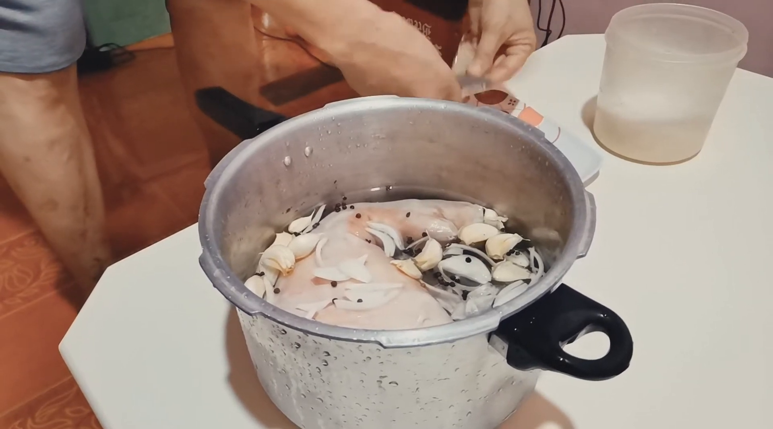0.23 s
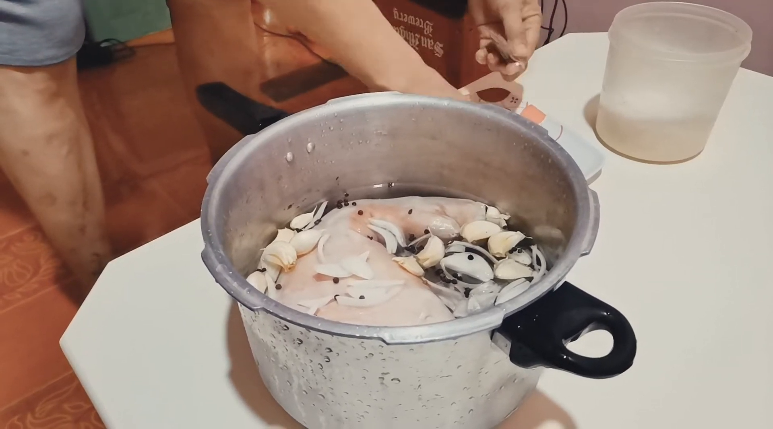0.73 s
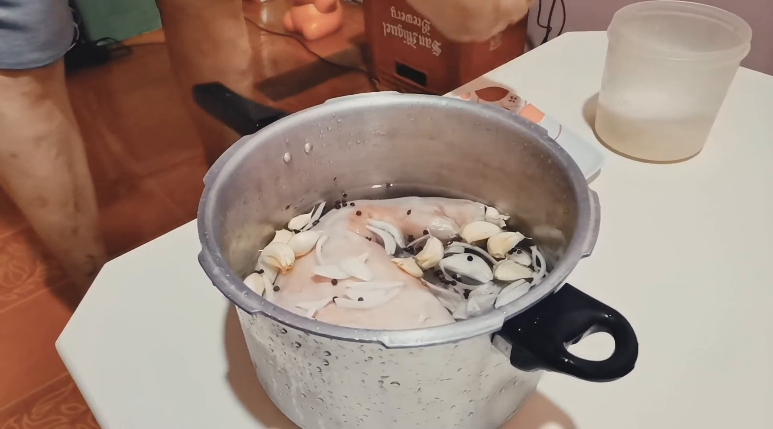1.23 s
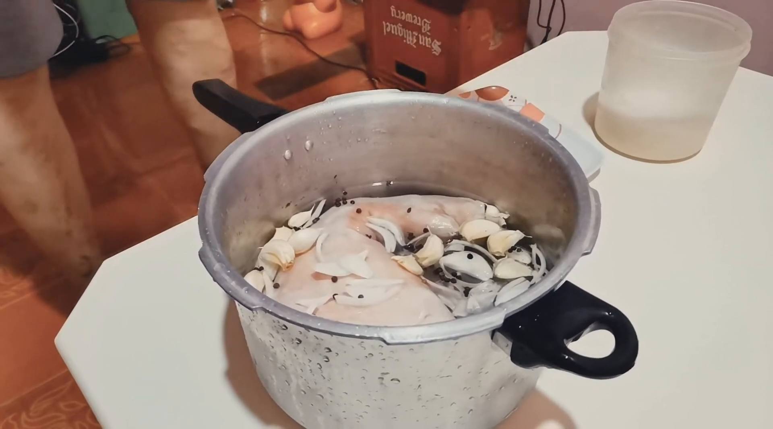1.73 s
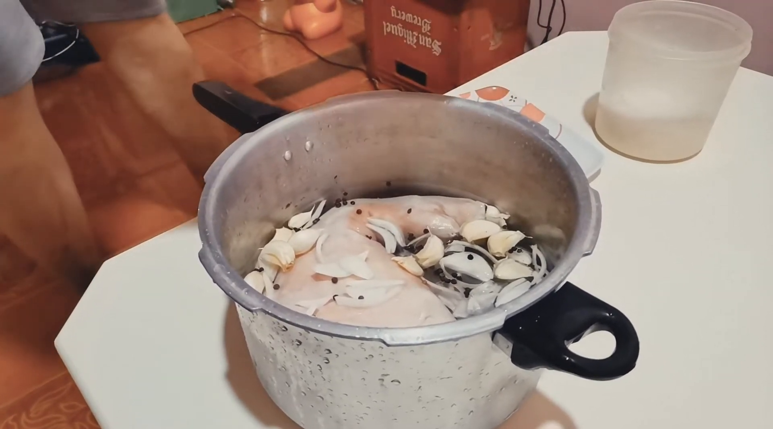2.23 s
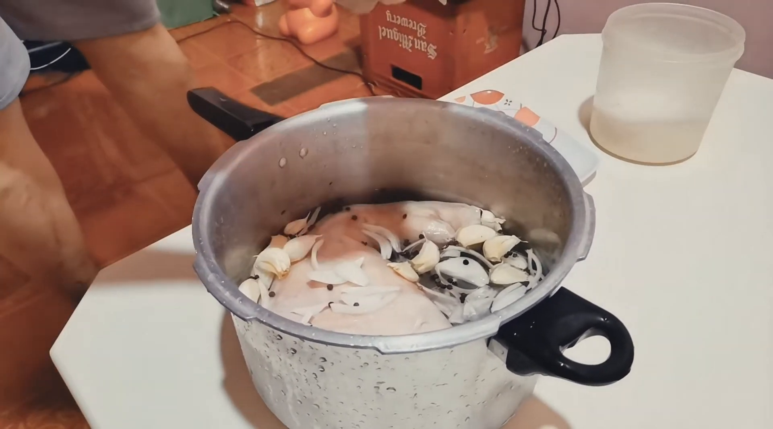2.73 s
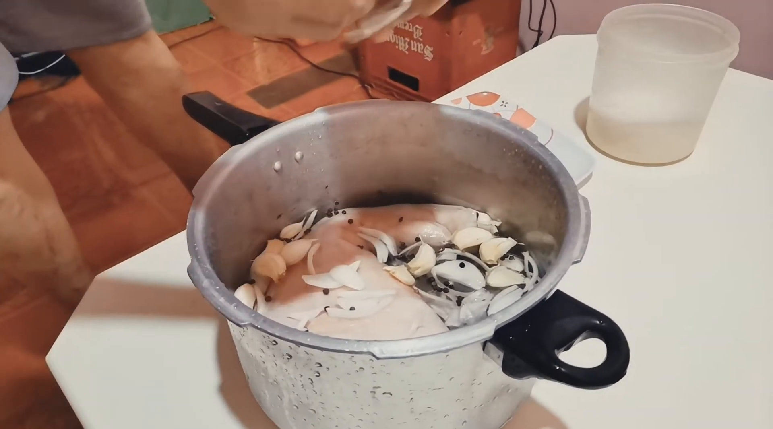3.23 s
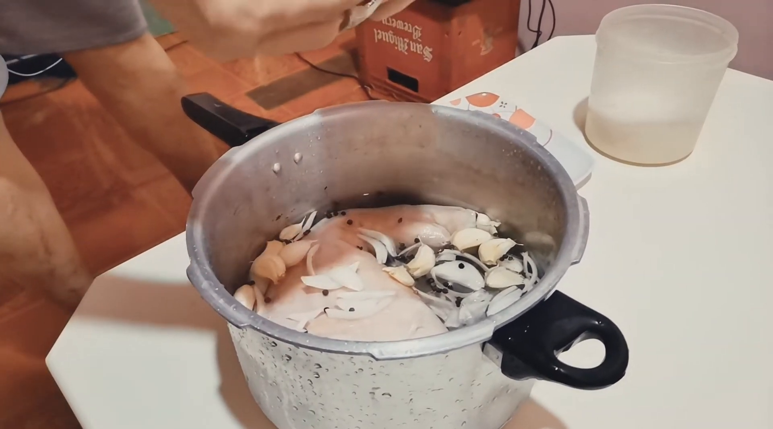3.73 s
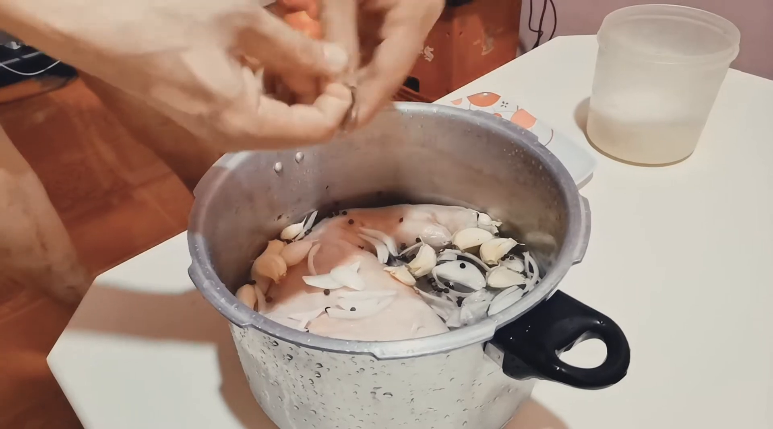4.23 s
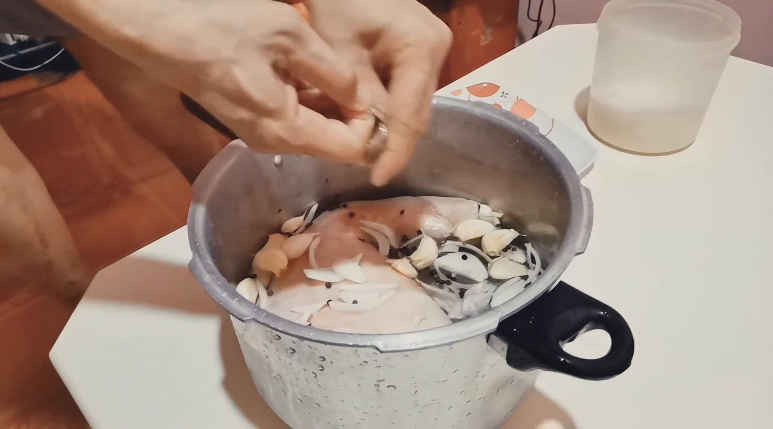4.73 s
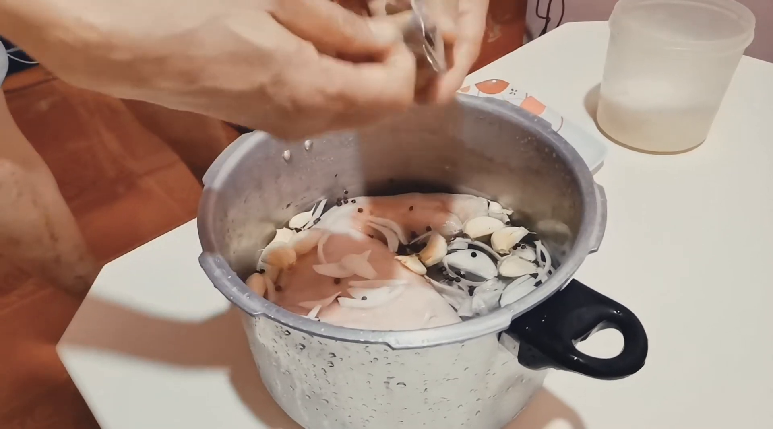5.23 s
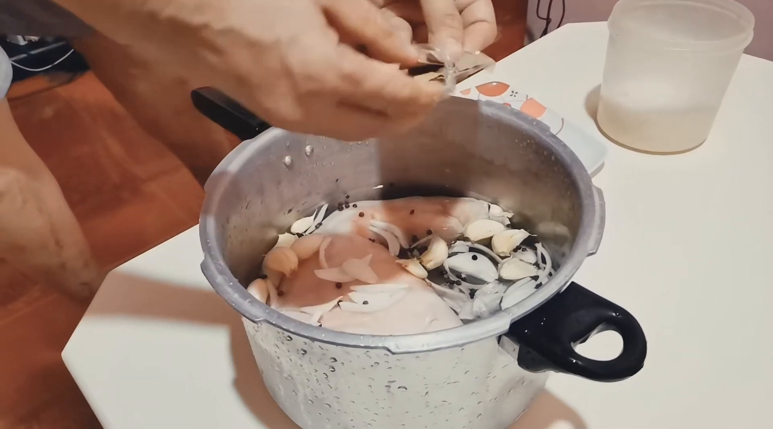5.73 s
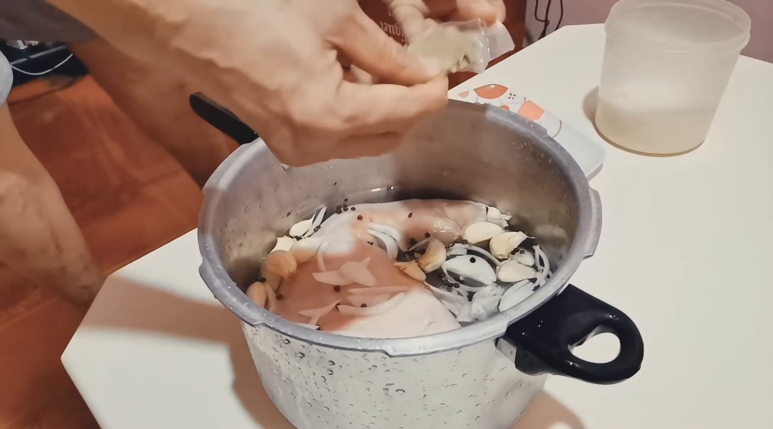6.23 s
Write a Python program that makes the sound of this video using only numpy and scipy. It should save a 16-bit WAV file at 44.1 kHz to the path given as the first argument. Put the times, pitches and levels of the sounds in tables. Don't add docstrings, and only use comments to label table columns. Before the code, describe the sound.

Hands crumple a stiff little bag of dried leaves close to a stereo microphone, left of centre. Sharp bright snaps and clumped crackles come irregularly, strongest in the first second, then finer and steadier. A distant slipper slaps the floor twice early on, barely audible; faint squeaks pass far left. Late crackles gain a slight hollow hum from a pot. Hard kitchen, low household rumble beneath.

```python
import sys
import numpy as np
from scipy import signal
from scipy.fft import rfft, irfft
from scipy.io import wavfile

SR = 44100
rng = np.random.default_rng(int(sys.argv[2]) if len(sys.argv) > 2 else 0)


def ratio(d):
    e = np.asarray(d, float) / 20
    return 10 ** e


def pcm_store(signal):
    levels = np.round(np.clip(np.atleast_2d(signal), -1, 1) * 32767)
    wavfile.write(sys.argv[1], SR, levels.astype(np.int16).T)


N = 286209

# start_s [s], level_db [dB], pitch_hz # of the crease [Hz]
SHARP_SNAPS = [(0.0313, -30, 6560), (0.0882, -30, 4490), (0.1521, -21, 2830), (0.3346, -32, 5680),
                  (0.3805, -23, 5690), (0.5023, -21, 4870), (0.6015, -27, 4800), (0.6365, -28, 2860),
                  (0.7168, -17, 3510), (0.8195, -21, 2440), (1.0425, -27, 4160), (1.1812, -35, 1900),
                  (1.3074, -33, 4410), (1.3548, -26, 5620), (1.484, -35, 2040), (1.6127, -37, 6220),
                  (1.6631, -30, 6170), (1.7285, -28, 3760), (1.8114, -29, 2080), (1.8841, -27, 3470),
                  (2.0418, -25, 3150), (2.0931, -28, 2840), (2.1695, -21, 2780), (2.2712, -31, 4070),
                  (2.3506, -28, 3850), (2.5496, -23, 2360), (2.5774, -25, 2840), (2.6115, -26, 4150),
                  (2.7252, -25, 4820), (2.9652, -24, 6390),
                  (3.2036, -27, 4130), (3.4186, -29, 2740), (3.5034, -31, 5990), (3.5817, -28, 3870),
               (3.686, -24, 6550), (3.7563, -27, 3110), (3.8601, -29, 6420), (3.904, -28, 6110),
               (3.9649, -36, 3660), (4.2238, -32, 6550), (4.2662, -31, 3260), (4.3121, -26, 3660),
               (4.4488, -30, 5040), (4.4722, -28, 4550), (4.5485, -32, 4550), (4.6089, -27, 5290),
               (4.6628, -30, 5470), (4.8643, -31, 3660), (4.9796, -29, 3220), (5.2928, -33, 2800),
               (5.3063, -28, 2850), (5.3662, -29, 2810), (5.6106, -27, 2850), (5.877, -28, 4520),
               (5.9673, -30, 4530), (6.0097, -30, 2880), (6.1175, -28, 2870), (6.2068, -26, 3610),
               (6.2911, -27, 4470), (6.3909, -31, 4500)]
SNAPS = SHARP_SNAPS


def snaps(place, level_db, low_db, high_db, tear_s):
    start_s, peak_db, pitch_hz = np.transpose(SNAPS)
    at = (start_s * SR).astype(int)
    clicks = np.zeros(N)
    luck = rng.random((len(start_s), 2, 14))
    for k in range(14):
        after = k > 0
        wait_s = after * (.0004 + luck[:, 0, k] ** 2 * 3 * tear_s)
        size = ratio(peak_db + level_db - 6.0 * after) * np.exp(-wait_s / tear_s)
        size *= np.cos(np.pi * luck[:, 1, k] * after)
        np.add.at(clicks, np.minimum(at + (wait_s * SR).astype(int), N - 1), size)
    latest = last_snap()
    _, low, high = hands()
    into = at[latest] + 200
    shape = pitch_hz[latest], low[into] + low_db, high[into] + high_db
    rings = creases(clicks, shape, cycles=8.3, spread_db=1.2, focus_db=19.0)
    heard = np.abs(coloured(placed(rings, *place).mean(axis=0), LEAF_COLOUR))
    tops = np.maximum.reduceat(heard, at)
    return rings * (ratio(peak_db + level_db) / tops)[latest]


def last_snap():
    at = (np.array(SNAPS)[:, 0] * SR).astype(int)
    return np.clip(np.searchsorted(at, np.arange(N), side="right") - 1, 0, None)


def crackle(per_s, level_db, low_db, high_db):
    press_db, low, high = hands()
    pitch_hz = np.array(SNAPS)[last_snap(), 2]
    sizes = ratio(2.94 * np.minimum(rng.exponential(1, N), 2.3)) * rng.choice([-1, 1], N)
    chance = per_s * ratio(4.0 * drift(30)) / SR
    grains = rms_one(sizes * (rng.random(N) < chance)) * ratio(press_db + level_db)
    shape = pitch_hz, low + low_db, high + high_db
    return creases(grains, shape, cycles=6.5, spread_db=6.5, focus_db=7.5)


# start_s [s], hold_s [s],
# level_db of the crackle [dB], low_creases_db [dB], high_creases_db [dB]
BAG_GRIPS = [(0.0, .15, -42, -14.5, -9), (.152, 0.0067, -33.5, -11, -36), (.334, .04, -47, -13, -3),
             (.38, 0.059, -41, -13.5, -6.5), (.502, 0.029, -34.5, -18, -9),
             (.601, 0.05, -44.5, -33, -3.5), (.716, 0.024, -35.5, 3, -27), (.82, 0.075, -37, -2.5, -36),
             (1.042, 0.05, -42.5, -7, -4), (1.181, 0.037, -64, 13, -14), (1.307, 0.04, -68, -8, -13),
             (1.484, .04, -51.5, -7, 6), (1.612, 0.034, -50.5, -6, -23),
             (1.663, 0.072, -43.5, -14, -4.5), (1.812, .06, -45.5, -25, -3.5),
             (1.884, 0.031, -34.5, -12.5, -10.5), (2.042, 0.11, -44.5, 0.5, -4),
             (2.169, 0.013, -37, -4.5, -10), (2.271, 0.12, -43.5, -8.5, -10),
             (2.35, 0.086, -40, -9, -16.5), (2.55, .1, -38.5, -7, -9), (2.69, 0.07, -40.5, -25, -9.5),
             (2.79, 0.063, -46.5, -8.5, 0), (2.945, 0.11, -42.5, -8, -3),
             (3.197, 0.059, -42, -36, -1), (3.276, 0.024, -45.5, -3, -2), (3.342, 0.04, -47.5, -1, -20),
             (3.501, 0.11, -44.5, -23, 0.5), (3.657, 0.18, -42.5, -31, -11), (3.762, 0.12, -39, -12.5, -4),
             (3.962, 0.0067, -50, -33, -21), (4.148, .02, -49.5, -7, -4), (4.212, 0.078, -44.5, -7, -7.5),
             (4.301, 0.13, -41, -6.5, -9.5), (4.445, 0.042, -40, -17, -10), (4.523, 0.1, -43.5, -17.5, -3),
             (4.661, 0.045, -42.5, -33, -4), (4.769, 0.088, -54, -11, -3.5),
             (4.87, 0.011, -49.5, -6.5, 0.5), (4.965, 0.16, -41, -6.5, -6),
             (5.366, 0.076, -39.5, -10.5, -6), (5.515, 0.1, -47, -11.5, -6.5),
             (5.607, 0.025, -45.5, -4, -11), (5.686, 0.14, -49, -9, -7), (5.862, 0.2, -42.5, -11, -4),
             (6.115, 0.14, -39.5, -8, -8), (6.292, 0.015, -42, -5.5, -6.5), (6.386, 0.062, -45, -4, -4)]
# start_s [s], swell_s [s], level_db [dB], low_creases_db [dB], high_creases_db [dB]
BAG_TWISTS = [
    (.84, 0.11, -39.5, -15, -5),
    (1.29, 0.076, -38.5, -5.5, -2),
    (1.84, 0.083, -45, -30, 5),
    (2.33, 0.15, -38, -50, 0),
    (3.07, 0.11, -52.5, -21, 2.5),
    (3.37, 0.088, -37.5, -14, -2.5),
    (3.96, 0.085, -38, -36, -0.5),
    (5.24, 0.1, -42.5, -7.5, -15.5),
    (6.09, 0.073, -34, -15, -7),
]
LOOSE_DB = [
    [-70],
    [-76],
    [-88],
]
RISE_S = [
    [.003],
    [.012],
    [.0015],
]
TWIST_SWELL_DB, LET_GO_DB_PER_S = 7, 418
BURST_DB, BURST_S = 7, .012


def hands():
    t = np.arange(0, N + 32, 32) / SR
    power = ratio(2 * np.array(LOOSE_DB))
    moves = ((BAG_GRIPS, 0, BURST_DB), (BAG_TWISTS, TWIST_SWELL_DB, 0))
    for rows, swell_db, burst_db in moves:
        for start_s, length_s, level_db, low_db, high_db in rows:
            since = t - start_s
            shape_db = swell_db * np.minimum(since / length_s - 1, 0)
            shape_db -= LET_GO_DB_PER_S * np.maximum(since - length_s, 0)
            shape_db += burst_db * np.exp(-np.abs(since) / BURST_S)
            group_db = np.array([[0], [low_db], [high_db]])
            power = power + np.clip(since / RISE_S, 0, 1) * ratio(2 * (level_db + shape_db + group_db))
    press_db, low, high = (np.interp(np.arange(N) / SR, t, 10 * np.log10(p)) for p in power)
    return press_db, low - press_db, high - press_db


def creases(clicks, shape, cycles, spread_db, focus_db):
    favoured_hz, low_db, high_db = shape
    pitches = np.geomspace(650, 15000, 20)
    picks = rng.standard_normal((4, N))
    octave_like = np.log(pitches[:, None] / favoured_hz) / 0.33
    near_db = focus_db * np.exp(-octave_like ** 2)
    chance_db = [spread_db * np.roll(picks[k % 4], k) + 4.8 * drift(7.2) for k in range(len(pitches))]
    gains = ratio(near_db + chance_db)
    group = np.searchsorted([1800, 7000], pitches)
    for k, group_db in enumerate((low_db, 0, high_db)):
        gains[group == k] *= ratio(group_db) / np.sqrt(np.mean(gains[group == k] ** 2, axis=0))
    return sum((-1) ** k * ring(clicks * gains[k], hz, cycles / hz) for k, hz in enumerate(pitches))


# pitch_hz [Hz], level_db [dB per Hz]
LEAF_COLOUR = [(240, -20), (400, -19.5), (636, -10), (708, -14), (994, -4), (1140, -5), (1960, 3.5),
               (2840, 9.5), (4650, 13.5), (5270, 14), (9180, 15.5), (10200, 9), (12100, 11), (13500, 19),
               (16000, 14)]


def leaves(bag, place, pan_db):
    lean_db = np.array([pan_db, -pan_db]) * 0.23
    pair = placed(bag, *place) + ratio(-34.5) * kitchen(bag, build_s=0.00025, count=5) * ratio(lean_db)
    pair = np.array([coloured(pair[0], LEAF_COLOUR, .5), coloured(pair[1], LEAF_COLOUR, -.5)])
    return split_at(pair, 420, "high", order=3)


def pot(bag):
    close = np.interp(np.arange(N) / SR, (5.1, 5.5), [0, 1])
    hum = ring(bag * close, 570, 0.0079)
    return ratio(-27.5) * placed(split_at(hum, 430, "high", order=3), 1.5, 0.0)


# start_s [s], level_db of the peak [dB]
SLIPPER_SLAPS = [
    (0.7167, -27),
    (0.8165, -30),
    (0.869, -37),
]
# pitch_hz [Hz], level_db [dB], t60_s [s]
SLIPPER_MODES = [
    (229, -15.5, 0.12),
    (323, -1.5, 0.0057),
    (970, -29, 0.04),
    (1540, -25, 0.025),
    (1850, -7.5, 0.015),
    (2380, 0, 0.006),
    (3120, 3, 0.0043),
    (4420, -10, 0.024),
]


def slaps(level_db):
    t = np.arange(N) / SR
    drive = np.zeros(N)
    for start_s, peak_db in SLIPPER_SLAPS:
        dying = np.exp(-np.maximum(t - start_s, 0) / 0.027)
        drive += ratio(peak_db + level_db) * (t > start_s) * dying
    drive *= rng.standard_normal(N)
    body = sum(ratio(db) * ring(drive, hz, t60_s) for hz, db, t60_s in SLIPPER_MODES)
    return split_at(body, 160, "high")


# start_s [s], length_s [s], from_hz [Hz], to_hz [Hz], level_db [dB]
FAR_SQUEAKS = [
    (.33, .12, 560, 620, -59),
    (1.58, .13, 1370, 1430, -61),
    (1.48, .08, 2150, 2050, -61),
    (1.82, .13, 2000, 2200, -56),
    (3.03, .17, 1110, 1230, -65),
    (3.14, .15, 1230, 1080, -66),
    (6.14, .14, 630, 590, -61),
]


def squeaks():
    t, out, breath = np.arange(N) / SR, np.zeros(N), drift(65)
    for start_s, length_s, from_hz, to_hz, level_db in FAR_SQUEAKS:
        u = np.clip((t - start_s) / length_s, 0, 1)
        hz = from_hz + (to_hz - from_hz) * u
        tone = np.sin(2 * np.pi * np.cumsum(hz) / SR)
        out += ratio(level_db) * np.sin(np.pi * u) * breath * tone
    return out


# pitch_hz [Hz], t60_s [s]
KITCHEN_T60 = [(250, 0.21), (1000, 0.34), (3000, 0.31), (6000, 0.41), (10000, 0.3), (15000, 0.24)]


def kitchen(x, build_s, count):
    t = np.arange(SR // 2) / SR
    hz = np.fft.rfftfreq(len(t), 1 / SR)
    edges = 60 * 2 ** np.arange(0, 9, .5)
    white = rfft(rng.standard_normal((count, 2, len(t))))
    echoes = 0
    for low, high in zip(edges, edges[1:]):
        band = irfft(white * ((hz >= low) & (hz < high)))
        echoes = echoes + band * ratio(-60 * t / at_hz(KITCHEN_T60, np.sqrt(low * high)))
    early = ratio(-5.0) * np.exp(-t / 0.031)
    echoes = echoes * (1 - np.exp(-t / build_s)) * (1 + early)
    spot = np.arange(N) / SR / .15 % count
    wet = 0
    for k, echo in enumerate(echoes):
        apart = np.abs((spot - k + count / 2) % count - count / 2)
        share = np.sqrt(np.clip(1 - apart, 0, 1))
        wet = wet + signal.fftconvolve((x * share)[None], echo, axes=1)[:, :N]
    return wet


def far_room(far):
    echoes = kitchen(far, build_s=0.00043, count=2)
    bass = split_at(echoes[0], 486, "low")
    return split_at(echoes, 486, "high") + placed(bass, 3.5, 0.0)


# pitch_hz [Hz], level_db [dB per Hz]
RUMBLE_COLOUR = [(15, -16.5), (32, -3), (45, -4.5), (60, -9.5), (90, -11.5), (125, 10), (200, -4.5),
                 (300, -15), (460, -19.5), (960, -20.5), (3500, -31.5), (9400, -82), (11000, -44),
                 (16000, -70)]
# start_s [s], level_db [dB]
BUSTLE = [(1.0, -52), (1.11, -58), (1.29, -47.5), (1.44, -51.5), (2.3, -54.5), (2.33, -48), (2.44, -59),
          (3.19, -55.5), (4.1, -63.5), (4.16, -55.5), (4.67, -60.5), (5.89, -49), (5.97, -58), (6.2, -61.5),
          (6.49, -60)]


def rumble(alike):
    mid, side = rng.standard_normal((2, N))
    pair = []
    for k in (1, -1):
        mixed = np.sqrt(1 + alike) * mid + k * np.sqrt(1 - alike) * side
        pair.append(coloured(mixed, RUMBLE_COLOUR) * ratio(k * 1.2))
    pair = np.array(pair)
    upper_db, = in_time(BUSTLE)
    usual_db = upper_db.mean()
    deep_db = usual_db + 4.5 + 0.83 * (upper_db - usual_db)
    deep = rms_one(split_at(pair, 110, "low")) * ratio(deep_db + drift(26))
    upper = rms_one(split_at(pair, 110, "high")) * ratio(upper_db + 4.0 + drift(7.1))
    return deep + upper


def placed(x, pan_db, lead_ms):
    n = np.arange(N)
    return np.array([np.interp(n + k * lead_ms * SR / 2000, n, x) * ratio(k * pan_db / 2) for k in (1, -1)])


# pitch_hz [Hz], left_minus_right_db [dB]
PORT_COLOUR = [(60, -10), (110, 25), (200, 35), (380, -2.5), (700, -7.5), (1290, -9), (2380, -7),
               (4400, -10.5), (8120, -6.5), (15000, -0.5)]


def coloured(x, spectrum, sides_db=0):
    hz = np.fft.rfftfreq(8192, 1 / SR)
    gain = ratio(at_hz(spectrum, hz) + sides_db * at_hz(PORT_COLOUR, hz))
    cepstrum = irfft(np.log(gain))
    cepstrum[1:4096] *= 2
    cepstrum[4097:] = 0
    return signal.fftconvolve(x, irfft(np.exp(rfft(cepstrum))))[:N]


def ring(clicks, hz, t60_s):
    r, w = ratio(-60 / (t60_s * SR)), 2 * np.pi * hz / SR
    return signal.lfilter([0, np.sin(w)], [1, -2 * r * np.cos(w), r * r], clicks + 1e-18)


def drift(rate):
    r = np.exp(-80 * np.pi * rate / SR)
    slow = signal.lfilter([1], [1, -2 * r, r * r], rng.standard_normal(N // 40 + 2002))[2000:]
    return np.interp(np.arange(N) / 40, np.arange(len(slow)), rms_one(slow))


def split_at(x, hz, side, order=2):
    return signal.sosfilt(signal.butter(order, hz, side, fs=SR, output="sos"), x)


def rms_one(x):
    return x / np.sqrt(np.mean(x ** 2) + 1e-20)


def in_time(rows):
    s, *columns = np.transpose(rows)
    return [np.interp(np.arange(N) / SR, s, c) for c in columns]


def at_hz(points, hz):
    known_hz, value = np.transpose(points)
    return np.interp(np.log(hz + 1), np.log(known_hz + 1), value)


# start_s [s], left_minus_right_db [dB], left_lead_ms [ms]
HAND_PLACE = [
    (0, 10.5, 0.062),
    (1.5, 14.5, -0.22),
    (3, 10.5, 0.056),
    (4.5, 10, 0.23),
    (5.5, 5, -0.011),
    (6.49, 5.5, 0.2),
]


def scene():
    pan_db, lead_ms = in_time(HAND_PLACE)
    place = pan_db + 2 * drift(15), lead_ms + .1 * drift(12)
    bag = snaps(place, level_db=-1.0, low_db=-1.5, high_db=5.5, tear_s=0.0029)
    bag = bag + crackle(per_s=1500, level_db=-24.5, low_db=9.5, high_db=3.0)
    near = leaves(bag, place, pan_db) + pot(bag)
    far = slaps(level_db=-26.5) + squeaks()
    return near + placed(far, 18.0, 0.0) + ratio(-22.0) * far_room(far) + rumble(alike=0.74)


def roll_off(x):
    return signal.sosfilt(signal.butter(12, 16990, fs=SR, output="sos"), x)


def record(dry):
    cut = signal.sosfilt(signal.cheby2(12, 40, 16300, fs=SR, output="sos"), dry)
    return roll_off(cut)


dry = scene()
out = record(dry)
pcm_store(out)
```